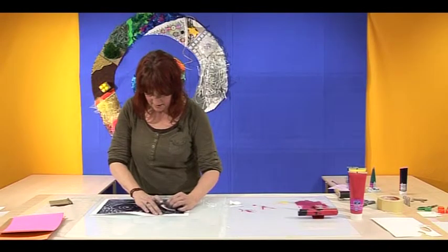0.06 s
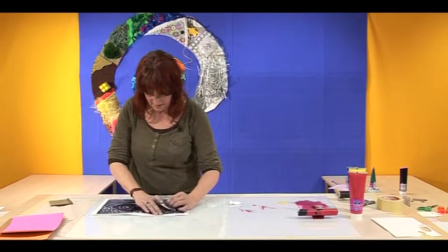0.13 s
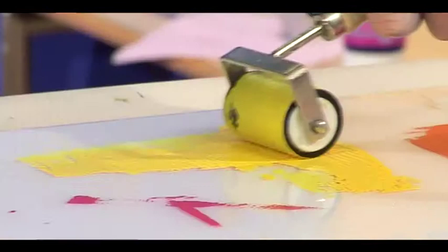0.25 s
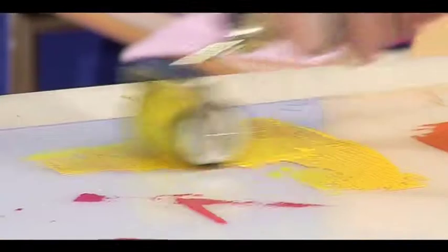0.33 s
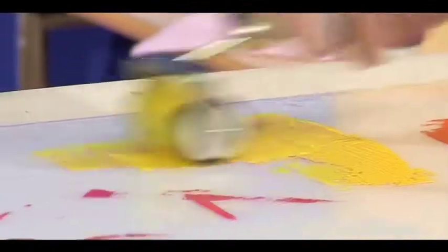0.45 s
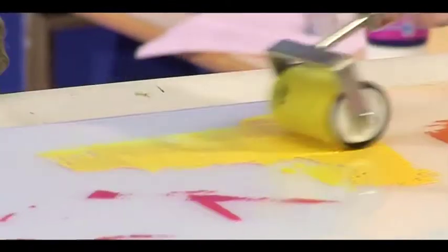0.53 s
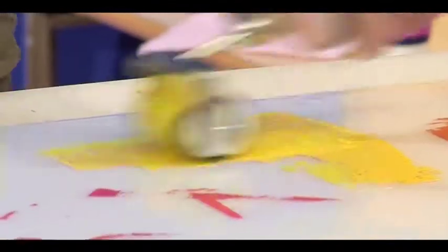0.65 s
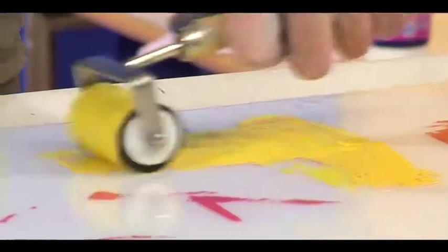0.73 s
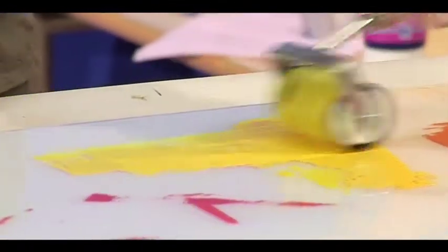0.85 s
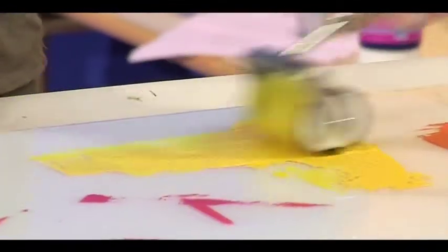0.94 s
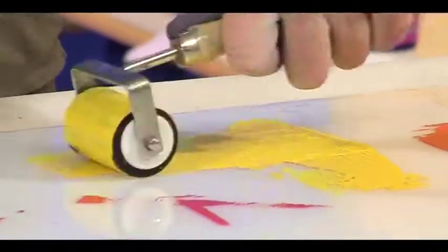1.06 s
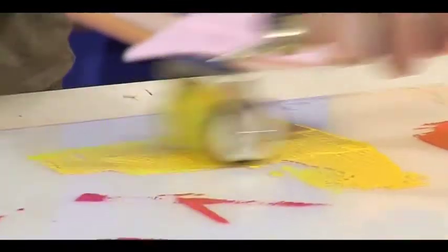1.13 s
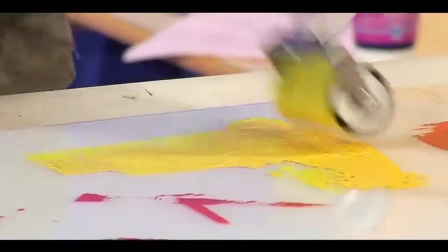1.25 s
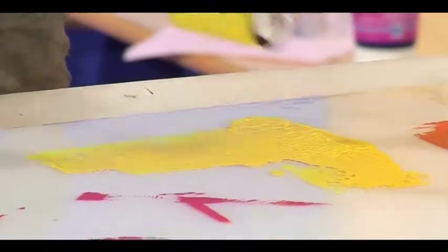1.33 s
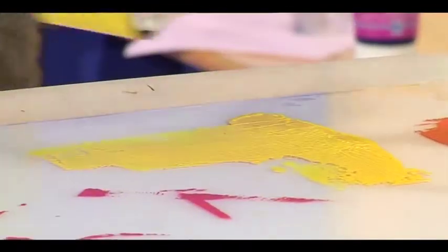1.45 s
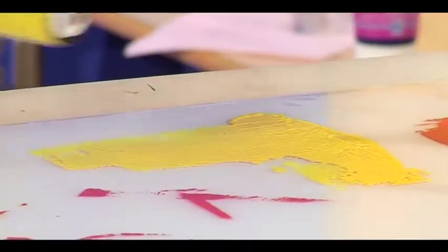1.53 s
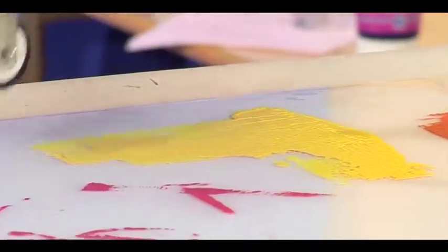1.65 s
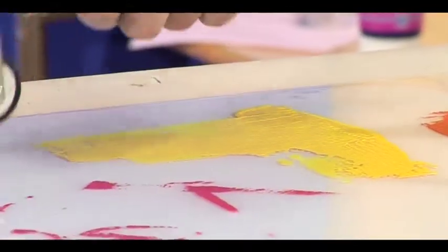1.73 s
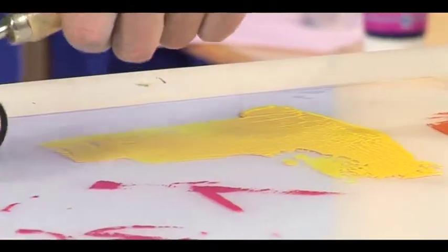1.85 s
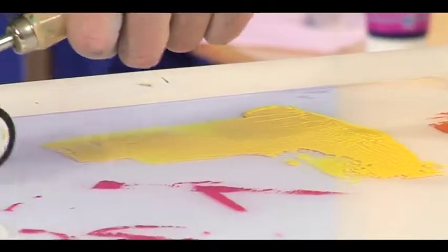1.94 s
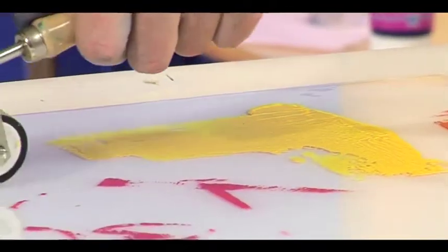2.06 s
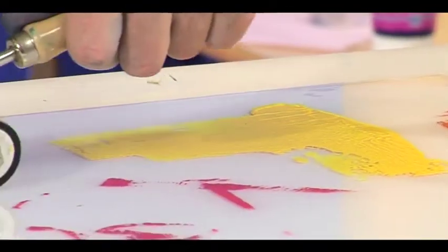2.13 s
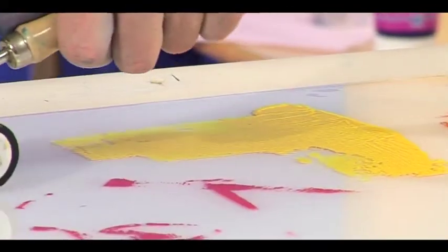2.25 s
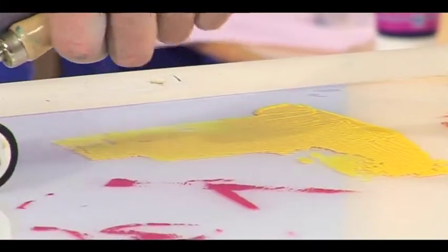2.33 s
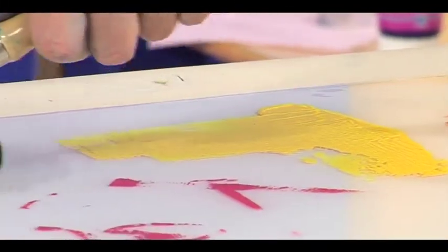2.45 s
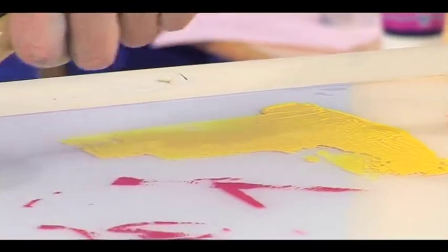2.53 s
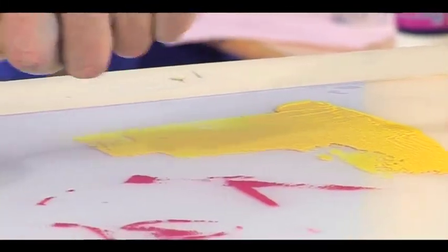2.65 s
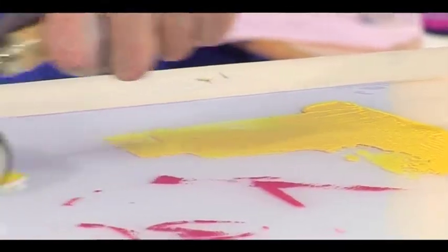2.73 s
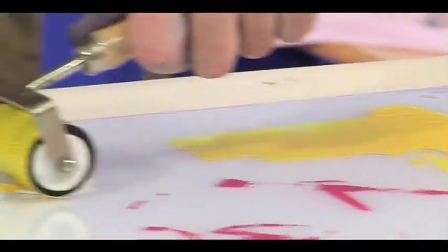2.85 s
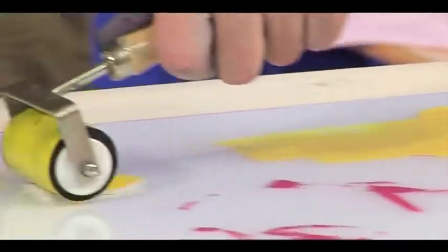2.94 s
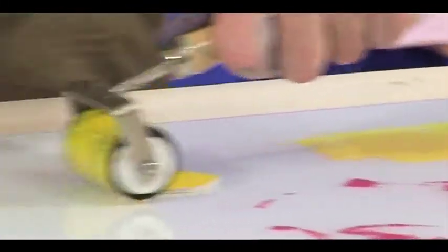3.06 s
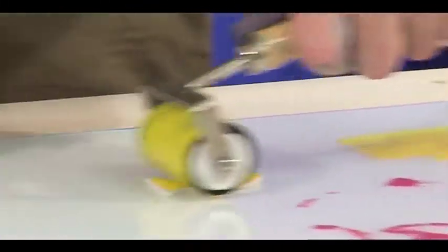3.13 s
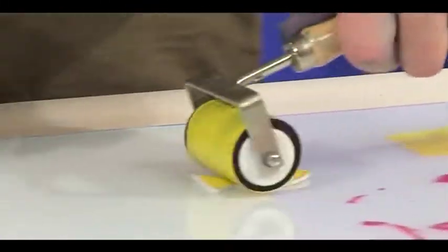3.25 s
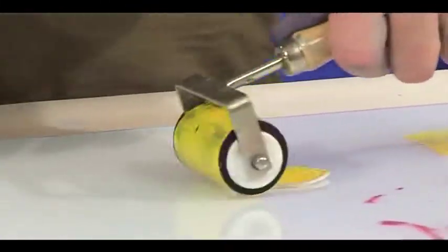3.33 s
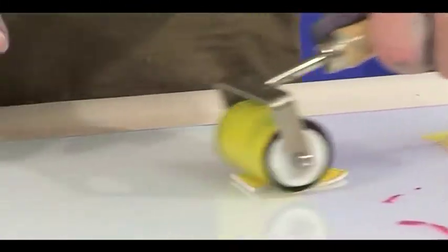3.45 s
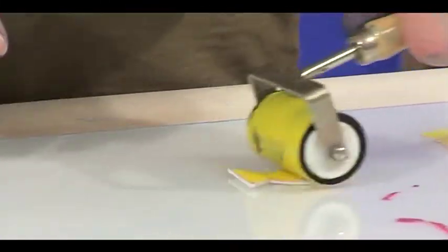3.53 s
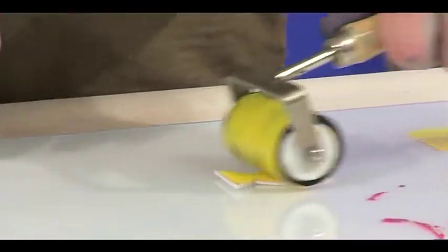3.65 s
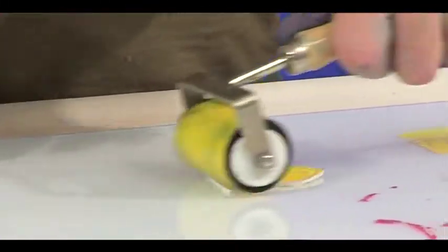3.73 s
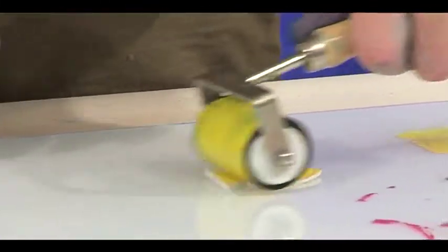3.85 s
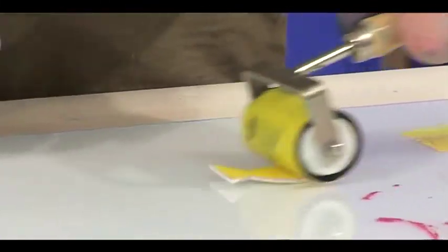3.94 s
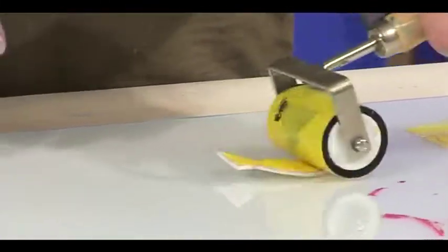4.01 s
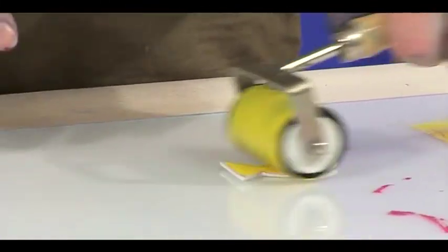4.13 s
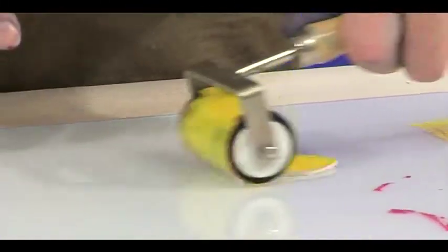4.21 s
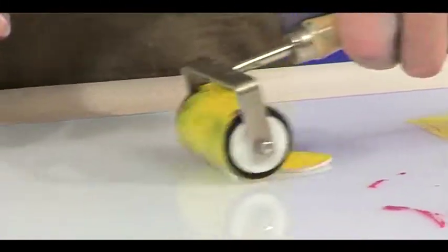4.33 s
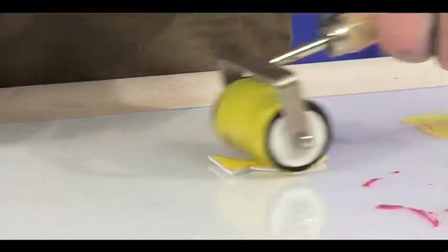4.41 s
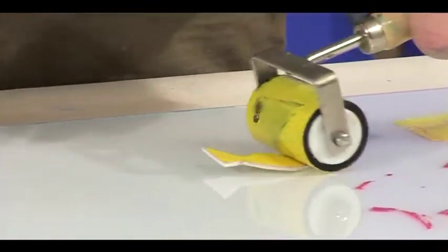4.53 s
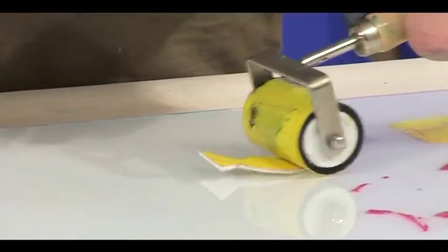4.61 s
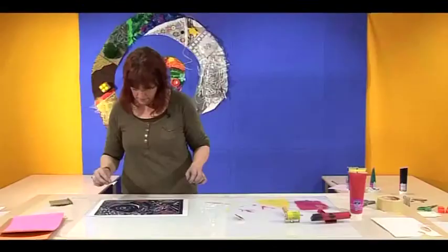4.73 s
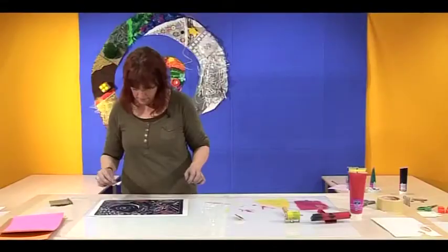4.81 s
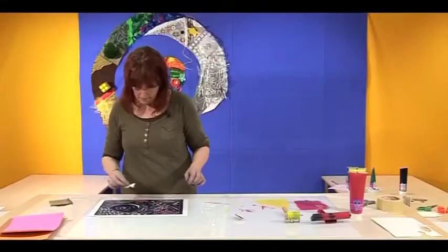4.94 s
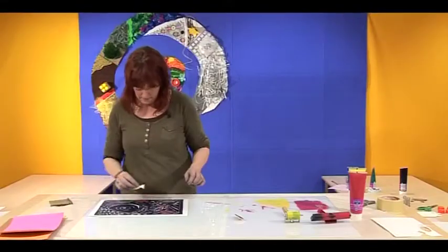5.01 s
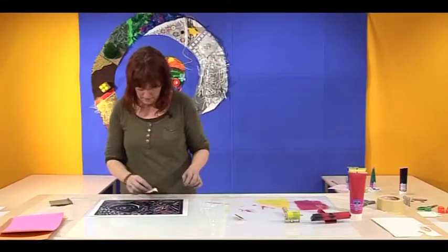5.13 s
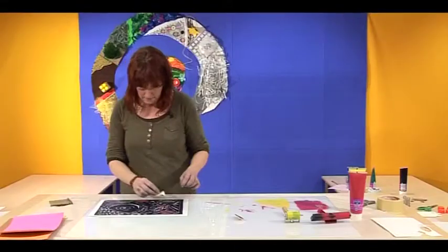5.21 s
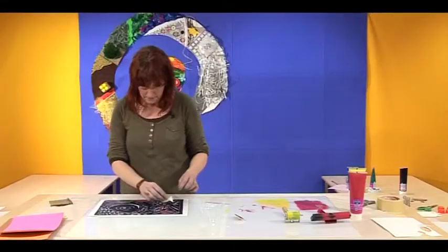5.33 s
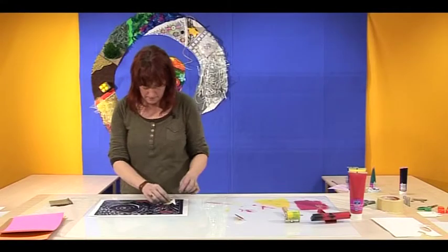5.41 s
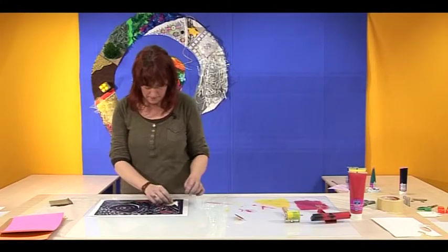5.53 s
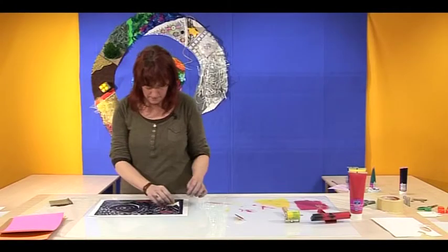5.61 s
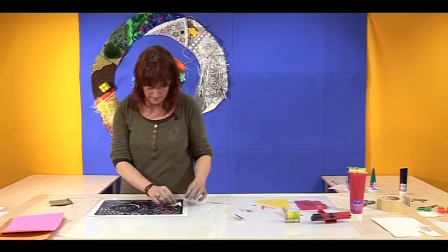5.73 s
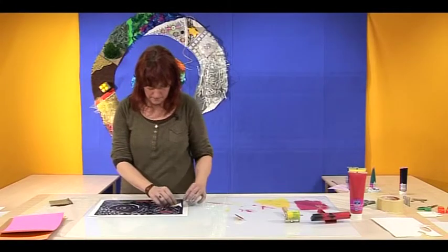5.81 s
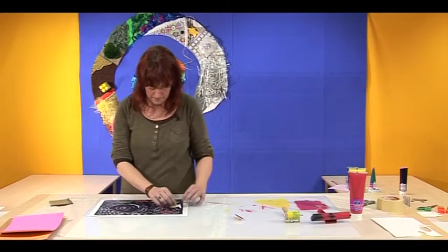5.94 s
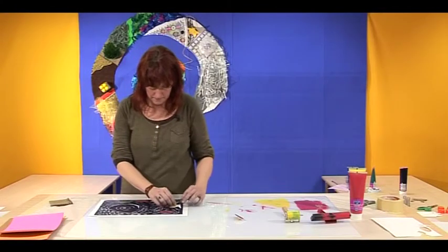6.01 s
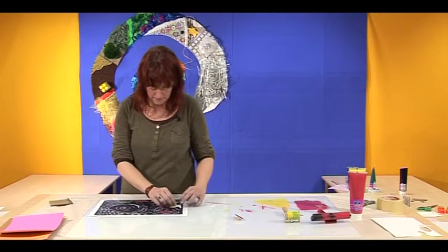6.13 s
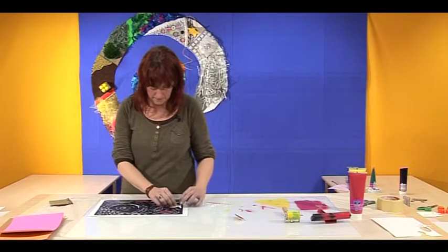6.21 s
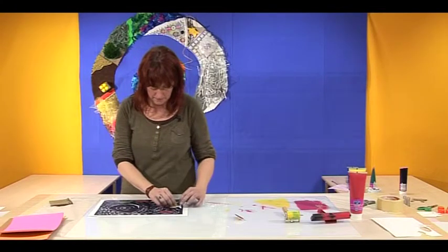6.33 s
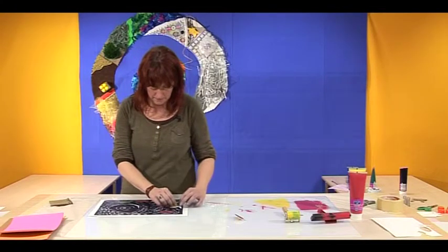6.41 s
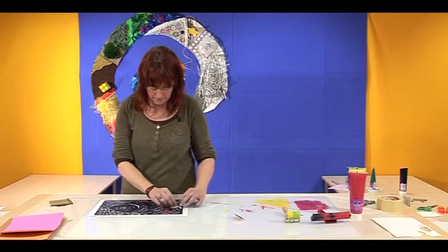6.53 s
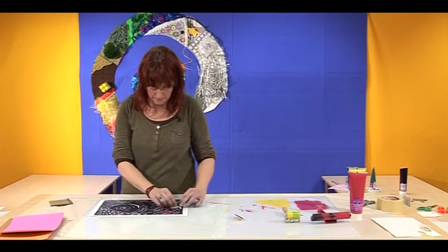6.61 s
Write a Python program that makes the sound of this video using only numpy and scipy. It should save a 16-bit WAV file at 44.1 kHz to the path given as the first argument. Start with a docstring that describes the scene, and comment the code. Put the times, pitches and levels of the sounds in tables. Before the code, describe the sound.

A quiet studio with low, steady ventilation rumble and a faint wavering hum, heard close in mono with a short room echo. From 0.14 to 0.33 s, dry ticks of paper and roller frame. From 0.34 to about 1.5 s, fast strokes through tacky ink: hollow table drumming, wet crackle turning to fine fizz, low surges of the arm, loud sharp cracks at 0.61 and 1.09 s, and a cluster of snaps at 1.32-1.38 s. From 1.5 to 2.8 s it quiets to soft rubbing, small clicks and dull knocks near 2.0-2.4 s. From 2.84 to 4.7 s, very short, rough squeaks near 1.9 kHz, at about 2.85, 2.94, 3.29, 3.68, 4.06-4.12 and 4.55-4.69 s, with faint chafing and hiss over card. At 4.8 s the echo cuts off; until the end, ventilation and faint paper rubs.

```python
"""In a studio with a low rumble of ventilation, a rubber hand roller is worked through tacky ink on a smooth
sheet, then rolled to and fro over a scrap of card. Paper is handled quietly before and after.
The parting ink is random clicks through colouring filters, the drumming table is noise through resonances,
ticks, snaps and knocks are struck resonators, and the dry axle squeaks as a rough, gliding harmonic tone."""
import sys
import numpy as np
from scipy import signal
from scipy.fft import rfft, irfft
from scipy.io import wavfile

SR = 44100
rng = np.random.default_rng(int(sys.argv[2]) if len(sys.argv) > 2 else 0)


def store_wav(level_fs):
    """Save 16-bit WAV to argv[1]."""
    pcm = np.round(np.clip(np.atleast_2d(level_fs), -1, 1) * 32767)
    wavfile.write(sys.argv[1], SR, pcm.T.astype(np.int16))


N = 294335
TIME = np.arange(N) / SR


def undb(db):
    """Level law: decibels to amplitude gain."""
    return 10 ** (np.asarray(db) / 20)


def unit(x):
    """Normalisation to a root-mean-square of 1."""
    return x / np.sqrt(np.mean(x ** 2) + 1e-20)


def peak(x, db):
    """Normalisation to a peak level in dB."""
    return x * undb(db) / np.abs(x).max()


def colour(x, points):
    """Spectral shaping: gains in dB interpolated along log frequency, then scaled to rms 1."""
    hz, db = np.transpose(points)
    freq = np.maximum(np.fft.rfftfreq(N, 1 / SR), 1)
    gain = undb(np.interp(np.log(freq), np.log(hz), db))
    return unit(irfft(rfft(x) * gain, N))


def ring(x, modes):
    """Modal resonance: parallel resonators of (Hz, width Hz, dB), summed."""
    out = 0
    for hz, width, db in modes:
        b, a = signal.iirpeak(min(hz, SR / 2 - 1), hz / width, SR)
        out = out + undb(db) * signal.lfilter(b, a, x)
    return out


def noise():
    """White noise: equal power at every frequency."""
    return rng.standard_normal(N)


def walk(hz):
    """Slow random drift: noise low-passed at hz, with spread 1."""
    lowpass = signal.butter(2, hz, fs=SR, output="sos")
    return unit(signal.sosfilt(lowpass, noise()))


def grains(rate, spread_db):
    """Shot noise: random tiny clicks, rate per second, a few much larger than the rest."""
    happens = rng.random(N) < rate / SR
    size_db = spread_db * np.minimum(rng.exponential(size=N), 5)
    return noise() * happens * undb(size_db)


def burst(scatter, decay_s, size=2000):
    """Impulsive excitation: a sharp blow and a decaying scatter of smaller contacts."""
    x = scatter * rng.standard_normal(size) * np.exp(-TIME[:size] / decay_s)
    x[0] += 1
    return x


def add(out, s, x):
    """Superposition: mix a short sound in at time s."""
    i = int(s * SR)
    out[i:i + len(x)] += x[:N - i]


def swell(s, db, length_s):
    """Gaussian envelope around time s, down to 1/e at length_s on either side."""
    return undb(db) * np.exp(-np.minimum(((TIME - s) / length_s) ** 2, 10 ** 2))


def envelope(t, length_s, attack_s, release_s, slope_db_per_s):
    """Onset, sustain and decay: rise from t = 0, hold on a slope in dB, die away exponentially."""
    rise = np.clip(t / attack_s, 0, 1)
    hold = undb(slope_db_per_s * np.clip(t, 0, length_s))
    return rise * hold * np.exp(-np.maximum(t - length_s, 0) / release_s)


# Spectrum of the ventilation. Each row: frequency in Hz, level in dB.
AIR = [(15, -62), (25, -39), (55, -1.5), (76, -10), (123, -10), (149, -11), (212, -19.5), (293, -12.5),
       (384, -20.5), (503, -22), (545, -21), (1070, -24.5), (3160, -39.5), (4490, -38.5), (16000, -43)]
AIR_DB, HUM_DB = -62, -64


def ventilation():
    """Broadband flow noise, almost steady, with a low hum that wavers in pitch and level."""
    hum_hz = 49 + 2.5 * walk(4)
    hum = np.sin(2 * np.pi * np.cumsum(hum_hz) / SR) * (1 + .7 * walk(5))
    air_gain = undb(AIR_DB + 0.17 * walk(5.7))
    return air_gain * colour(noise(), AIR) + undb(HUM_DB) * hum


# Spectrum of the low bumping. Each row: frequency in Hz, level in dB.
BUMP = [(15, 2), (28, 8.5), (45, -2.5), (70, -3.5), (110, -4), (200, -45.5)]
# Spectrum of the rubbing. Each row: frequency in Hz, level in dB.
RUB = [(70, -15), (120, -9), (180, 14), (300, 1), (450, 4.5), (800, -8), (1500, -11), (2500, -13.5),
       (5000, -25)]
# Moves of the arm and card. Each row: centre in seconds, half length in seconds, bumping in dB, rubbing in dB.
MOVES = [(.42, 0.27, -57, -58), (0.71, 0.12, -51, -55), (1.244, 0.39, -53, -54.5), (1.478, 0.091, -68, -67),
         (1.678, 0.23, -54, -67), (2.063, 0.16, -70, -62), (2.557, 0.21, -56.5, -68),
         (2.697, 0.094, -67, -62.5), (2.915, .12, -55.5, -62.5), (3.513, 0.12, -59.5, -69.5),
         (4.722, .06, -62, -85), (5.193, 0.076, -63, -69), (6.36, 0.05, -70, -90)]
# Short passes of the roller over the card.
# Each row: centre in seconds, half length in seconds, rubbing in dB, hiss of the ink in dB.
PASSES = [(3.093, 0.044, -60.5, -77), (3.434, 0.029, -63, -73), (3.842, 0.061, -63, -73),
          (4.036, .07, -72, -71.5), (4.304, .08, -62, -70.5), (4.542, 0.1, -69, -74)]
# Broad resonance of the hiss. Each row: frequency in Hz, width in Hz, level in dB.
PASS_HISS = [(6400, 14000, 0)]
# Brief rubs of paper and rubber.
# Each row: centre in seconds, level in dB, resonance in Hz, width in Hz, half length in seconds.
BRUSHES = [(.612, -49, 700, 364, 0.06), (0.778, -49.5, 710, 400, 0.0044), (1.094, -49, 715, 377, 0.055),
           (1.251, -51.5, 724, 400, .006), (2.056, -69.5, 1240, 1490, 0.098),
           (2.444, -65.5, 2920, 700, 0.022), (4.27, -61.5, 460, 250, 0.044),
           (4.849, -69.5, 3900, 5160, 0.019), (5.348, -72, 4800, 6000, 0.053),
           (5.863, -68.5, 1390, 1500, 0.054), (5.888, -61.5, 299, 70, 0.048),
           (6.645, -74, 2170, 3500, 0.084)]
# the hands are never quite still, and rub more while the roller is at work
FIDGET_BUMP_DB, FIDGET_RUB_DB, WORK_RUB_DB = -72, -74.5, -68.5
ROLLING_START_S, ROLLING_END_S = 0.337, 4.817


def handling():
    """Friction as many tiny contacts: bumping arm, sliding card, passing roller and brief rubs add up."""
    working = (TIME > ROLLING_START_S) & (TIME < ROLLING_END_S)
    bump_power, hiss_power = undb(FIDGET_BUMP_DB) ** 2, 0
    rub_power = undb(np.where(working, WORK_RUB_DB, FIDGET_RUB_DB)) ** 2
    for s, length_s, bump_db, rub_db in MOVES:
        bump_power = bump_power + swell(s, bump_db, length_s) ** 2
        rub_power = rub_power + swell(s, rub_db, length_s) ** 2
    for s, length_s, rub_db, hiss_db in PASSES:
        rub_power = rub_power + swell(s, rub_db, length_s) ** 2
        hiss_power = hiss_power + swell(s, hiss_db, length_s) ** 2
    out = np.sqrt(bump_power) * colour(noise(), BUMP)
    out += np.sqrt(rub_power) * colour(grains(3000, 1.95), RUB)
    fibres = grains(4000, 2.3)
    out += np.sqrt(hiss_power) * unit(ring(ring(fibres, PASS_HISS), PASS_HISS))
    for s, db, hz, width, length_s in BRUSHES:
        body = [(hz, width, 0)]
        out += swell(s, db, length_s) * unit(ring(ring(fibres, body), body))
    return out


# Small ticks of paper and roller frame. Each row: start in seconds, peak level in dB, top edge in Hz.
TICKS = [(0.1362, -49.5, 5230), (0.175, -34.5, 2500), (0.1865, -42, 2560), (0.204, -42, 3170),
         (0.219, -53, 3180), (0.2335, -39.5, 3200), (0.3009, -28.5, 6550), (.3075, -51, 7000),
         (0.3232, -44, 5000), (0.325, -48, 5000), (0.3314, -38, 6500), (2.239, -40.5, 10100),
         (2.422, -43, 3260), (3.078, -50.5, 4000), (3.428, -56, 4030), (6.171, -61, 13900)]
# Resonances of a tick. Each row: frequency in Hz, width in Hz, level in dB.
TICK_MODES = [(1670, 650, 0.5), (2390, 370, 1), (3020, 440, 6), (5300, 1100, -4.5), (8100, 1700, -29)]


def ticks():
    """Contact stiffness: dry clicks whose upper band edge falls, and sounds duller, when contact is soft."""
    out = np.zeros(N)
    for s, db, top_hz in TICKS:
        contact = signal.butter(4, [1000, top_hz], "bandpass", fs=SR, output="sos")
        click = ring(burst(0.12, 0.0018), TICK_MODES)
        add(out, s, peak(signal.sosfilt(contact, click), db))
    return out


# Rolls through the ink. Each row: start in seconds, length in seconds, attack in seconds, rolling in dB,
# drumming in dB, ink crackle in dB, fine fizz at the start in dB.
ROLLS = [(0.337, 0.17, .002, -46.5, -49, -50, -67), (0.579, 0.08, 0.041, -44, -50, -65, -67),
         (0.758, 0.052, .004, -51, -51, -61, -61), (0.822, .16, 0.0035, -46.5, -50, -50.5, -66),
         (1.058, 0.076, 0.036, -42.5, -48.5, -71, -72), (1.246, 0.1, 0.0035, -50, -60, -59, -62)]
# Table under the roller. Each row: frequency in Hz, width in Hz, level in dB.
TABLE_MODES = [(235, 14, 1), (310, 13, -2), (355.2, 5.6, 5), (386, 50, -2.5), (448, 26, 2), (534, 39, 1),
               (597, 25, -3), (654, 63, -2), (698, 37, 2.5), (785, 39, -1.5), (834, 27, 0), (920, 25, -21),
               (1004, 28, -0.5)]
# Lowest mode of the table. Each row: frequency in Hz, width in Hz, level in dB.
DRUM_MODE = [(179.6, 23, 0)]
# Spectrum of the thick parting ink. Each row: frequency in Hz, level in dB.
CRACKLE = [(400, 9), (900, 6.5), (1300, 6.5), (2000, 5.5), (2700, 1.5), (4200, -2), (5200, -0.5),
           (6200, -23), (9000, -8), (16000, -32)]
# Spectrum of the finest ink threads. Each row: frequency in Hz, level in dB.
FIZZ = [(2000, -15), (5000, -12), (6400, -9), (7200, -11.5), (9000, -10), (10000, -4), (12000, -8.5),
        (14500, -5), (16000, -18)]


def inking():
    """Forced vibration and film rupture: the roller drums on the table while threads of ink break."""
    drum = unit(ring(ring(noise(), DRUM_MODE), DRUM_MODE))
    rolling_spectrum = [(100, -26), (250, 4.5), (1000, -7.5), (2000, -9.5), (5000, -4)]
    rolling = colour(ring(grains(2000, 1.2), TABLE_MODES), rolling_spectrum)
    # threads break in clumps; each one both crackles and fizzes
    threads = grains(5000, 2.4) * undb(2.5 * walk(120))
    # sound, coast in s, slope in dB per s: during a roll the thick crackle gives way to fizz
    layers = [(rolling, 0.062, -23.5),
              (drum, 0.11, 0),
              (colour(threads, CRACKLE), 0.14, -44),
              (colour(threads, FIZZ), 0.011, 87)]
    out = np.zeros(N)
    for k, (sound, coast_s, slope) in enumerate(layers):
        power = np.zeros(N)
        for s, length_s, attack_s, *levels_db in ROLLS:
            shape = envelope(TIME[:SR], length_s, attack_s, coast_s, slope)
            add(power, s, (undb(levels_db[k]) * shape) ** 2)
        out += sound * np.sqrt(power)
    return out


# The table swings as the roller is pressed down or turned back.
# Each row: centre in seconds, peak level in dB, pitch in Hz, half length in seconds.
SURGES = [(.548, -36.5, 19, 0.046), (.552, -42.5, 55, 0.018), (0.67, -41.5, 425, 0.012),
          (0.792, -35.5, 185, 0.015), (1.026, -37, 20, 0.042), (1.034, -43.5, 62, 0.018),
          (1.139, -39.5, 440, 0.0085), (1.273, -38.5, 180, 0.019), (1.381, -41, 178, 0.019)]


def surges():
    """Transient oscillation: the table's swing under the arm's weight as sines in Gaussian envelopes."""
    out = np.zeros(N)
    for s, db, hz, length_s in SURGES:
        swing = np.sin(2 * np.pi * (hz * TIME + rng.random()))
        out += swell(s, db, length_s) * swing
    return out


# Ink film letting go. Each row: start in seconds, peak level in dB, starting level of the fizz after it in dB.
SNAPS = [(.5815, -40, -77), (0.6072, -13, -50.5), (0.615, -37, -68), (1.0607, -40, -78), (1.0873, -13, -49),
         (1.0936, -31, -76), (1.3177, -24.5, -79), (1.3227, -30, -79), (1.332, -25.5, -82),
         (1.3385, -26, -83), (1.345, -32, -81), (1.3495, -29, -82), (1.3547, -35, -83),
         (1.3817, -22.5, -64)]
# Resonances of a snap. Each row: frequency in Hz, width in Hz, level in dB.
SNAP_MODES = [(3720, 980, -5), (7200, 1700, 0), (10260, 1300, 3.5), (12050, 1400, 7.5), (14300, 2100, -1.5)]


def snaps():
    """Sudden release: a patch of ink lets go with a sharp crack, and a fizz of fine threads dies away."""
    out, after = np.zeros(N), np.zeros(N)
    for s, db, fizz_db in SNAPS:
        add(out, s, peak(ring(burst(0.1, 0.0014), SNAP_MODES), db))
        add(after, s, undb(fizz_db) * np.exp(-TIME[:SR // 3] / 0.057))
    return out + after * colour(grains(7100, 3.1), FIZZ)


# Soft knocks on the table.
# Each row: start in seconds, peak level in dB, pitch in Hz, decay of the contact scatter in seconds.
KNOCKS = [(2.009, -49, 128, 0.043), (2.068, -44, 111, 0.055), (2.163, -46.5, 640, 0.014),
          (2.421, -42, 150, 0.0062), (2.423, -50.5, 654, 0.038), (2.851, -43, 106, 0.059),
          (2.959, -50, 110, 0.045), (3.445, -48, 66.5, 0.016)]


def knocks():
    """Heavy damping: hand and roller bump the table top, whose resonance is nearly as wide as its pitch."""
    out = np.zeros(N)
    for s, db, hz, decay_s in KNOCKS:
        body = [(hz, 0.95 * hz, 0)]
        blow = burst(0.1, decay_s, size=9000)
        add(out, s, peak(ring(ring(blow, body), body), db))
    return out


# Overtones of the stick-slip motion. Each row: multiple of the pitch, level in dB.
OVERTONES = [(2, 1.5), (3, -12.5), (4, -18)]
# Shrill top, stronger when the axle bites hard. Each row: multiple of the pitch, level in dB.
SHRILL = [(5, -2.5), (6, -2.5), (7, -11), (8, -21)]
LEAD_S = .025  # room for the whistle before the catch
WHISTLE_DB, WHISTLE_RISE_S = -8, 0.0043
ATTACK_S, CATCH_S, RELEASE_S = 0.0016, 0.0021, 0.0035
SAG_DB_PER_S, OVERTONE_SAG_DB_PER_S = 68, 50
OVERTONE_GROWTH = 1.7  # exponent: overtones come later and leave sooner than the fundamental
WOBBLE_DB = 1.5  # the bite tightens in waves: richer and flatter
# the shrill top's level at the reference bite, and its growth with force and with time held
SHRILL_DB, HARD_BITE_DB, SHRILL_DB_PER_DB, SHRILL_DB_PER_S = -23, -36, 1.5, 422
CATCH_ROUGH, ROUGH_PER_S = 0.39, 4  # rough as it catches, and rougher again as the grip wears out
JITTER, FLUTTER, HALF_TONE = 0.022, 0.33, 0.014  # shares of pitch, level, level


def harmonics(phase, table):
    """Fourier synthesis: a sum of sines at whole multiples of one phase."""
    return sum(undb(db) * np.sin(round(multiple) * phase) for multiple, db in table)


def squeak(length_s, whistle_hz, hz, glide_hz, wobble_hz, wobble_rate, db, bright_db, rough,
           jitter, flutter, rasp):
    """Stick-slip self-oscillation: a thin whistle is pulled to the squeak's pitch, then wobbles and glides."""
    t = TIME[:len(rasp)] - LEAD_S
    held_s = np.clip(t, 0, length_s)
    caught = 1 / (1 + np.exp(-t / ATTACK_S))
    loose = 1 / (1 + np.exp(t / CATCH_S))
    whistle = undb(WHISTLE_DB) * np.exp(np.minimum(t, 0) / WHISTLE_RISE_S)
    release = np.exp(-np.maximum(t - length_s, 0) / RELEASE_S)
    grip = (caught + (1 - caught) * whistle) * release

    wave = np.cos(2 * np.pi * wobble_rate * held_s)
    pitch = hz + glide_hz * (held_s / length_s - .5) - wobble_hz * wave
    pitch = pitch + (whistle_hz - pitch) * loose
    rough = np.clip(rough + CATCH_ROUGH * loose + ROUGH_PER_S * held_s, 0, 1) * caught
    phase = 2 * np.pi * np.cumsum(pitch * (1 + JITTER * rough * jitter)) / SR

    shrill_db = SHRILL_DB + SHRILL_DB_PER_DB * (db - HARD_BITE_DB) + SHRILL_DB_PER_S * held_s
    rich = harmonics(phase, OVERTONES) + undb(shrill_db) * harmonics(phase, SHRILL)
    overtone_db = bright_db + WOBBLE_DB * wave - OVERTONE_SAG_DB_PER_S * held_s
    tone = np.sin(phase) + undb(overtone_db) * caught * grip ** OVERTONE_GROWTH * rich
    # alternate slips differ slightly, which puts faint lines between the harmonics
    tone = tone * (1 + HALF_TONE * np.sin(phase / 2) + FLUTTER * rough * flutter)
    level = undb(db - SAG_DB_PER_S * held_s)
    return grip * level * (np.sqrt(2) * tone + rough ** 3 * rasp)


# Axle squeaks. Each row: catch in seconds, length in seconds, opening whistle in Hz, pitch in Hz,
# glide from start to end in Hz, wobble in Hz, wobbles per second, starting level in dB,
# overtones relative to the fundamental in dB, roughness before the catch and wear are added (1 is full).
SQUEAKS = [(2.843, 0.022, 1840, 1939, 20, 65, 65, -44, -1.5, 0.41),
           (2.943, 0.0085, 2035, 2004, -39, 0, 92, -44.5, -3.5, 0.2),
           (3.257, 0.0053, 2080, 1970, -120, 0, 80, -55, -20, .5),
           (3.2936, 0.023, 2080, 1956, 5, 17, 59, -42, 0, 0.4),
           (3.625, 0.0032, 2130, 2200, 0, 0, 80, -54, -22, 0.25),
           (3.6836, 0.018, 2080, 1966, -57, 10, 50, -42.5, -1.5, 0.42),
           (4.062, 0.035, 2200, 1850, 4, 25, 76, -38, 0.5, 0.4),
           (4.098, 0.014, 1800, 1750, 30, 8, 92, -46, -2, 1.1),
           (4.117, 0.0073, 1860, 1963, 115, -4, 72, -41, -3, 0.2),
           (4.552, 0.0049, 1990, 1863, -3, 20, 80, -47.5, -9, 0.4),
           (4.621, 0.015, 2060, 1870, -21, 8, 91, -40.5, -2, 0.4),
           (4.662, 0.027, 1850, 1960, 141, 30, 72, -42.5, -5, 0.25),
           (4.692, 0.0064, 1960, 1960, 35, 0, 80, -58, 7, 0)]
# Spectrum of the slipping axle's rasp. Each row: frequency in Hz, level in dB.
RASP = [(800, -63), (2000, 2), (4500, 7.5), (7300, 3), (9000, -9), (16000, -27)]
# Modes of the steel frame. Each row: frequency in Hz, width in Hz, level in dB.
FRAME_MODES = [(5480, 240, 3.5), (7320, 90, 3), (13150, 33, 23), (14800, 230, 16)]
# The axle chafes before it catches. Each row: centre in seconds, level in dB, half length in seconds.
CHAFES = [(3.247, -67.5, 0.048), (3.583, -67, 0.025), (3.636, -64, 0.034), (4.036, -65, 0.1),
          (4.527, -63, 0.04), (4.584, -62, 0.018)]
# Resonances of the chafing bearing. Each row: frequency in Hz, width in Hz, level in dB.
CHAFE_MODES = [(2087, 160, 3), (2490, 340, -2), (3500, 1740, -4)]


def axle():
    """Stick-slip and sympathetic resonance: the bearing squeaks, and the frame sings when overtones meet it."""
    tones = np.zeros(N)
    jitter, flutter = walk(720), walk(150)
    rasp = colour(noise(), RASP)
    for s, *shape in SQUEAKS:
        span = slice(int(s * SR), int(s * SR) + SR // 10)
        add(tones, s - LEAD_S, squeak(*shape, jitter[span], flutter[span], rasp[span]))
    # single slips ping the bearing before they lock into a tone
    chafe = unit(ring(ring(grains(2200, 1.1), CHAFE_MODES), CHAFE_MODES))
    chafe_gain = sum(swell(*row) for row in CHAFES)
    return tones + ring(tones, FRAME_MODES) + chafe * chafe_gain


def studio(x, wet_db, t60_s, treble_t60_s, treble_db=0):
    """Reverberation: a diffuse tail, stronger at its start, whose treble dies sooner than the rest."""
    t = TIME[:SR]
    white = rng.standard_normal(SR) * (1 + 1.2 * np.exp(-t / 0.009))
    low = signal.sosfilt(signal.butter(2, 3000, fs=SR, output="sos"), white)
    treble = white - low
    tail = low * undb(-60 * t / t60_s) + treble * undb(treble_db - 60 * t / treble_t60_s)
    tail = tail * (t > .005)  # nothing returns in the first 5 ms
    tail = tail / np.sqrt(np.sum(tail ** 2))
    return undb(wet_db) * signal.fftconvolve(x, tail)[:N]


ECHO_CUT_S = 4.817  # an edit cuts the squeaks' reverberation off abruptly here


def scene():
    """Superposition of direct and reverberant sound; an edit cuts the squeaks' reverberation off abruptly."""
    squeaks = axle()
    work = snaps() + ticks() + inking()
    squeak_echo = studio(squeaks, wet_db=-12, t60_s=1.13, treble_t60_s=0.76, treble_db=-1.5)
    squeak_echo *= np.clip((ECHO_CUT_S - TIME) / 0.00082, 0, 1)
    work_echo = studio(work, wet_db=-11.5, t60_s=0.9, treble_t60_s=0.48)
    near = squeaks + work + surges() + knocks() + handling()
    return (near + squeak_echo + work_echo + ventilation())[None]


def record(dry):
    """Band limiting: a steep elliptic low-pass cuts the top above 16 kHz."""
    return signal.sosfilt(signal.ellip(10, .2, 70, 16000, fs=SR, output="sos"), dry)


dry = scene()
out = record(dry)
store_wav(out)
```